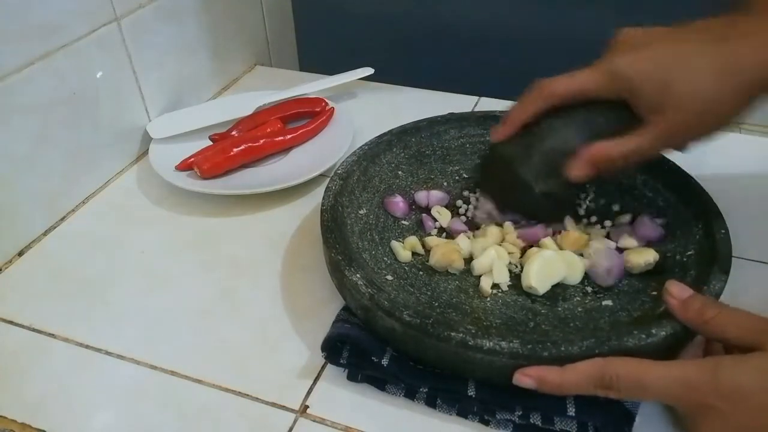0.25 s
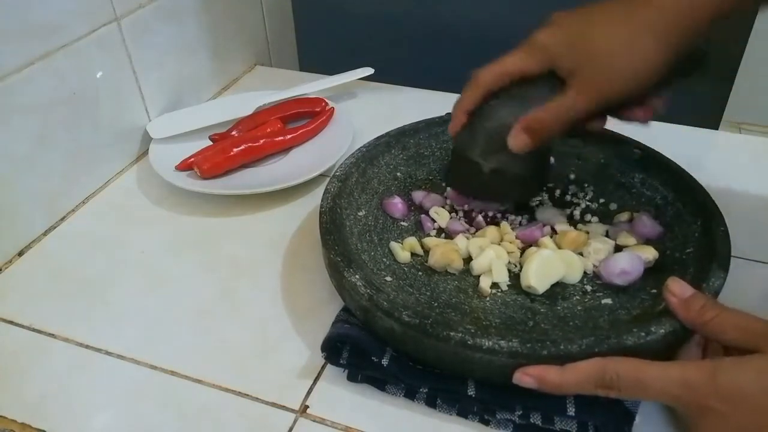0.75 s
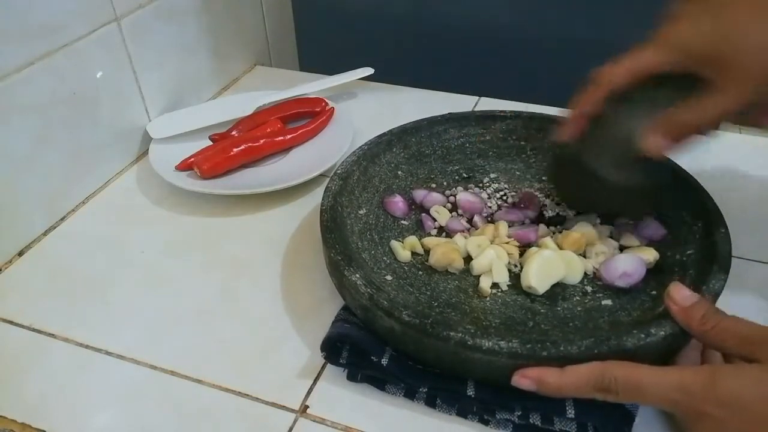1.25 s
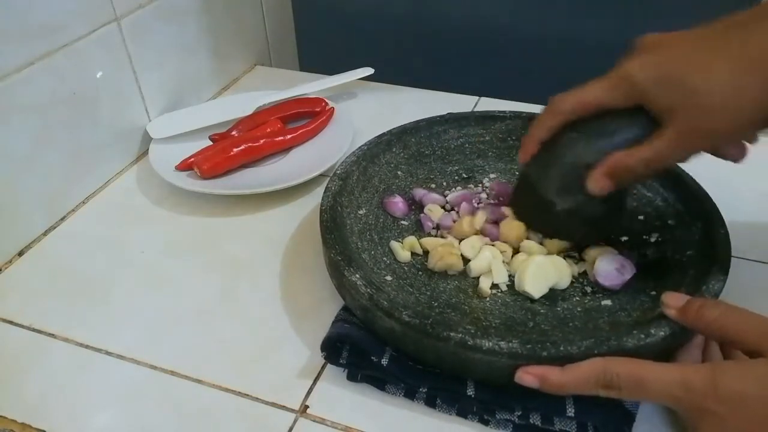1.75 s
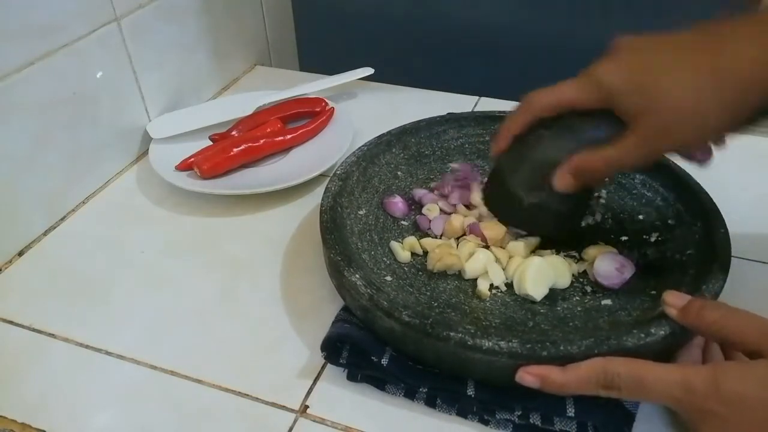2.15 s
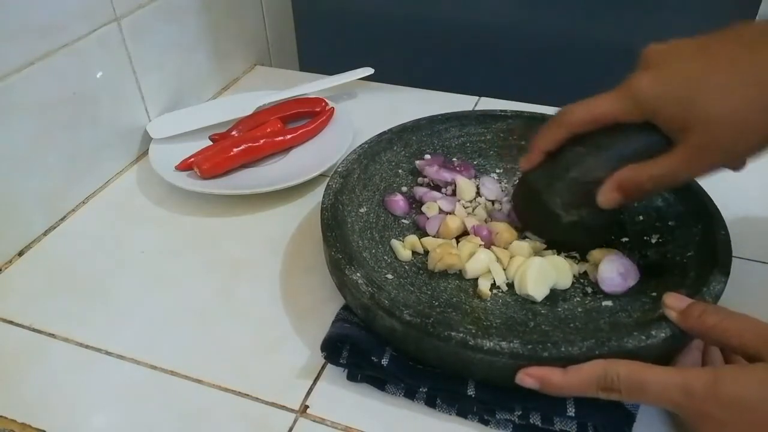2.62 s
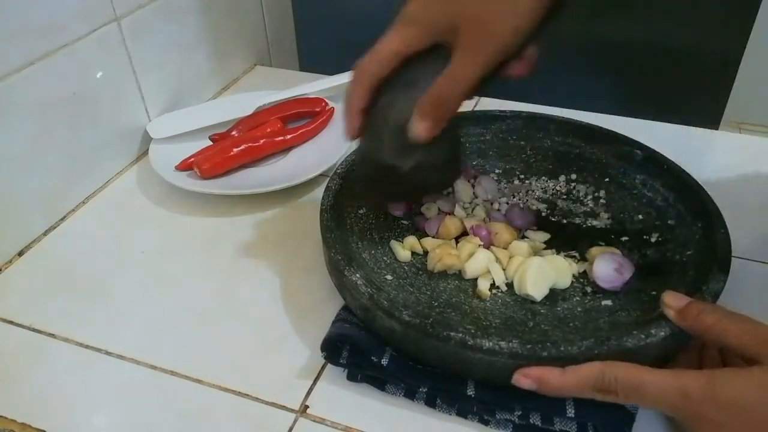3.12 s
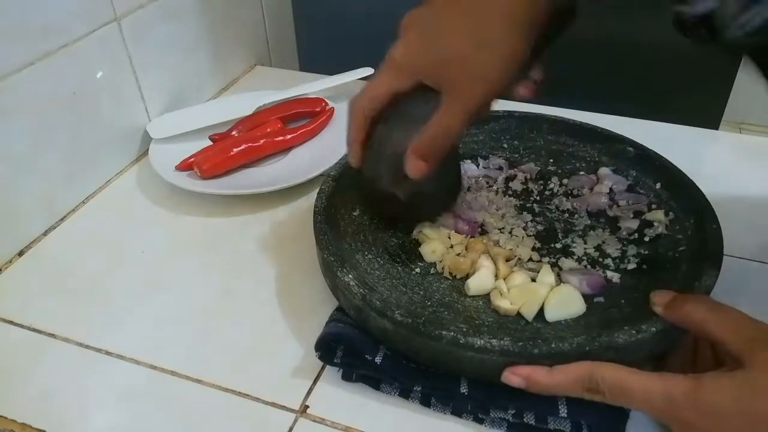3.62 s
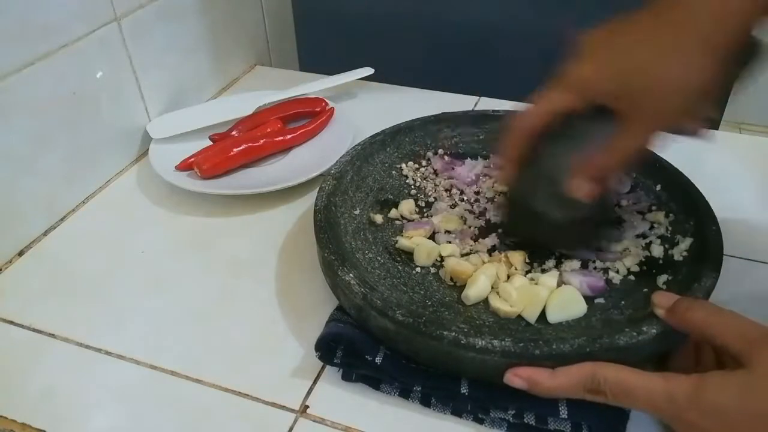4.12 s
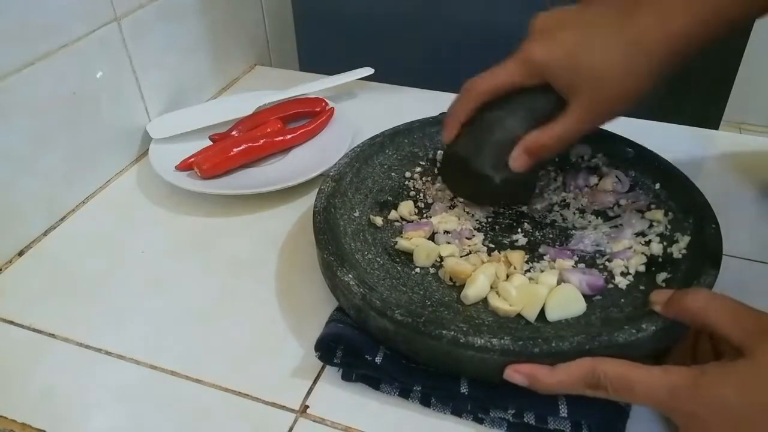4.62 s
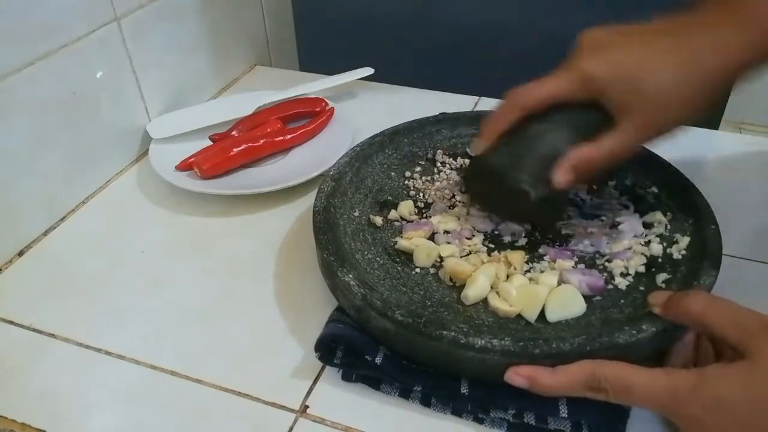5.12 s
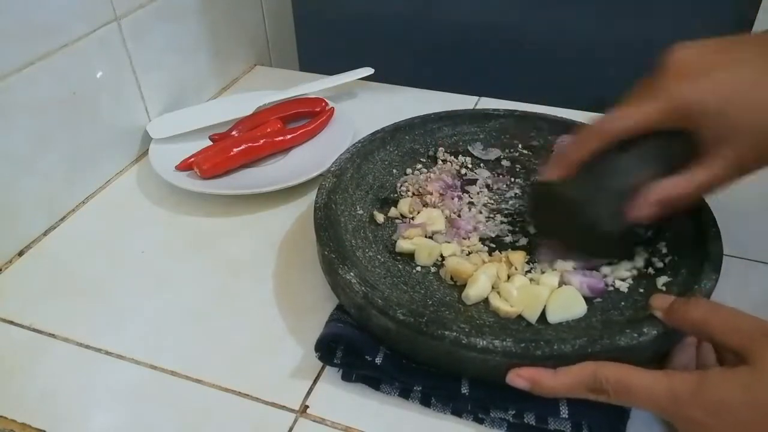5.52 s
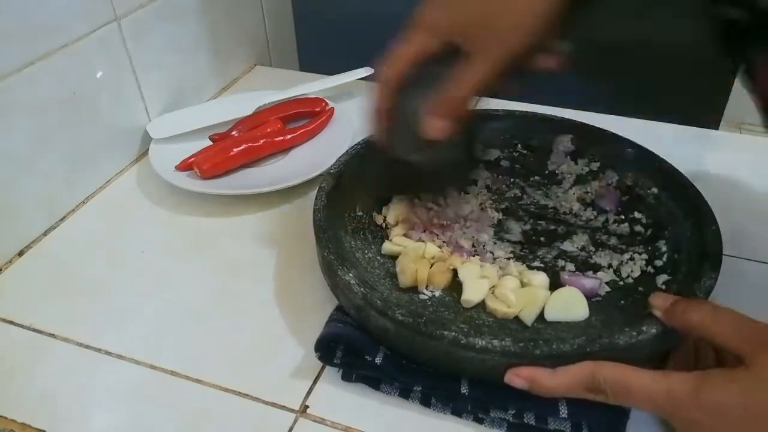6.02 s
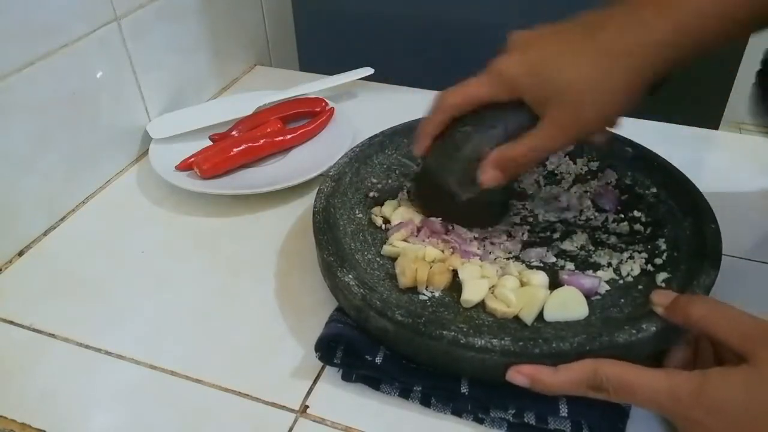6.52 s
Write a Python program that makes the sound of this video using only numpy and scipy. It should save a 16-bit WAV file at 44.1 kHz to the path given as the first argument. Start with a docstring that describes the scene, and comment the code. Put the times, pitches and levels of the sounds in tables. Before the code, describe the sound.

In a small tiled kitchen with a faint steady hum, a heavy stone pestle grinds spices from the first moment. Coarse crunching, dry crackle and stone rubbing pulse several times a second, with low thumps through the counter. After two short lulls the strokes resume, and bright hard knocks stand out in the second half. The microphones are close, stereo, with short hard reflections.

```python
"""An appliance hums throughout in a small hard kitchen: wavering sines over a soft wash of air.
From the start a stone pestle grinds spices in a flat mortar, in short strokes with brief lulls: bursting
noise for grit, the same kind of noise through the mortar's modes and through the counter's.
Seeds crack as coloured noise bursts; light knocks on the stone ring as decaying sines, and from the
middle on come the hardest. Tiled walls answer, and two microphone ports hear it from apart."""
import sys
import numpy as np
from scipy import signal
from scipy.fft import rfft, irfft, next_fast_len
from scipy.io import wavfile
from scipy.ndimage import uniform_filter1d, map_coordinates

SR = 44100
rng = np.random.default_rng(int(sys.argv[2]) if len(sys.argv) > 2 else 0)


def makeup_ratio(level_db):
    """Linear amplitude ratio for a level in decibels (20 dB per factor of ten)."""
    decades = np.asarray(level_db, float) / 20
    return 10 ** decades


def persist_wave(psi):
    """Save psi, clipped to +-1, as 16-bit WAV."""
    counts = np.round(np.clip(psi, -1, 1) * 32767).astype(np.int16)
    wavfile.write(sys.argv[1], SR, np.atleast_2d(counts).T)


N = 297675
T = np.arange(N) / SR

# The mortar's ringing modes. Each row: frequency in Hz, t60 of the free ring in s,
# relative level in dB when knocked, relative level in dB when rubbed.
MORTAR_MODES = [(1305.4, 0.089, 3.5, -8), (2264, 0.11, 1, 2), (3260, 0.13, 13, -13.5),
                (2250, 0.2, -30, -19), (812, 0.13, -23, -11), (1013, 0.018, -22, -11),
                (4190, 0.13, -45, -6.5), (5320, 0.22, -39, -19), (5700, 0.06, -31.5, -53)]


def unit(x):
    """Scaled to rms 1."""
    return x / np.sqrt(np.mean(x ** 2) + 1e-20)


def along(points, hz):
    """(Hz, value) points read on a log frequency axis."""
    f, v = np.transpose(points)
    return np.interp(np.log(hz + 1), np.log(f + 1), v)


def wobble(rate):
    """A smooth random curve with rate knots a second."""
    knots = rng.standard_normal(int(N * rate / SR) + 4)
    return map_coordinates(knots, [T * rate])


def filtered(x, response):
    """x shaped by a complex response, a function of frequency in Hz."""
    m = next_fast_len(N + SR // 2)
    return irfft(rfft(x, m) * response(np.fft.rfftfreq(m, 1 / SR)), m)[..., :N]


def peak(f, hz, width_hz):
    """One causal resonance of gain 1 at its centre."""
    return 1j * f * width_hz / (hz * hz - f * f + 1j * f * width_hz)


def spread(pair):
    """Mixes two unrelated signals so that left and right are as alike as the two ports hear them."""
    # Each row: frequency in Hz, left-right correlation (1 = identical).
    likeness = [(100, 1), (210, 1), (330, 0.4), (500, 0.033), (3000, 0.19), (15000, 0.15)]

    def mid_side_gains(hz):
        angle = np.arccos(np.clip(along(likeness, hz), -1, 1)) / 2
        return np.array([np.cos(angle), np.sin(angle)])

    mid, side = filtered(pair, mid_side_gains)
    return np.array([mid + side, mid - side])


def patchy(pair, depth_db):
    """Random patches of gain over time and frequency, the same in both channels."""
    z = signal.stft(pair, nperseg=256)[2]
    field = uniform_filter1d(rng.standard_normal(z.shape[1:]), size=8, axis=0)
    field = uniform_filter1d(field, size=6, axis=1)
    return signal.istft(z * makeup_ratio(depth_db * unit(field)), nperseg=256)[1][:, :N]


def crunch(per_second, size_db, life):
    """Noise under a hail of decaying bursts of very uneven size; life is their decay constant in s."""
    sizes = makeup_ratio(size_db * np.minimum(rng.exponential(size=N), 3.5))
    starts = (rng.random(N) < per_second / SR) * sizes
    hail = signal.lfilter([1], [1, -np.exp(-1 / (life * SR))], starts)
    return unit(hail * rng.standard_normal((2, N)))


def add(out, s, sound):
    """Lays a sound into both channels at time s."""
    at = round(s * SR)
    out[:, at:at + sound.shape[-1]] += sound


def room_tone():
    """Appliance hum of sines, each wavering by itself, over coloured noise that swells gently."""
    # Hum partials. Each row: frequency in Hz, rms level in dB around which it wavers.
    partials = [(50, -64), (100, -60), (151, -67), (200, -72), (250, -69), (300, -69), (442, -72),
                (491, -73), (540, -69), (589, -72), (887, -72)]
    # Colour of the air. Each row: frequency in Hz, relative level in dB per Hz.
    air_colour = [(15, -22), (30, -5), (70, -24), (300, -6), (410, -16.5), (540, -6.5), (1200, -17),
                  (1570, -13.5), (3000, -24), (7700, -34.5), (15500, -37)]
    hum = np.zeros(N)
    for hz, db in partials:
        tone = np.sin(2 * np.pi * (hz * T + rng.random()))
        hum += np.sqrt(2) * makeup_ratio(db + 1.9 * wobble(26)) * tone
    air = unit(filtered(spread(rng.standard_normal((2, N))), lambda hz: makeup_ratio(along(air_colour, hz))))
    air_db = -57 + 2 * wobble(6)
    return hum + makeup_ratio(air_db) * air


def pushes():
    """Gains of grit, stone and weight: each push swells and falls, silent until the pestle is down."""
    # Pushes of the pestle. Each row: time of the peak in s, ms in which the grit falls 20 dB, then
    # relative levels in dB of the grit, the bare stone rubbing and the weight on the counter.
    strokes = [(0, 300, -45, -49.5, -41.5), (.12, 155, -45, -61, -45), (.215, 105, -28, -30.5, -29),
               (.3, 143, -34, -43, -37.5), (0.377, 108, -35, -42.5, -41), (.5, 80, -55, -50, -50),
               (0.54, 79, -32, -38.5, -33.5), (.604, 100, -32.5, -43, -31.5), (0.677, 95, -31.5, -32, -32),
               (.755, 86, -56, -48.5, -45.5), (.86, 60, -53, -39, -55), (0.891, 113, -41, -35, -37.5),
               (0.989, 107, -38, -40.5, -35.5), (1.07, 154, -56, -55.5, -47), (1.215, 131, -59.5, -45, -52),
               (1.468, 110, -39.5, -77, -59), (1.555, 170, -37, -76, -48.5), (1.621, 97, -67, -44, -45),
               (1.719, 95, -31.5, -38, -32.5), (1.848, 171, -37, -47, -39), (2.023, 157, -47.5, -43, -45.5),
               (2.108, 91, -51, -48, -43), (2.164, 131, -34, -38.5, -36.5), (2.305, 143, -39.5, -45.5, -43),
               (2.39, 100, -54, -50, -44), (2.474, 128, -35, -44, -41.5), (2.514, 118, -36, -50, -47),
               (2.637, 98, -39.5, -38.5, -38.5), (2.767, 131, -49, -39, -39), (2.87, 148, -56, -64, -70),
               (3.2, 127, -47.5, -66, -43), (3.265, 57, -31.5, -42, -32), (3.364, 86, -38.5, -42.5, -40.5),
               (3.45, 56, -34.5, -35.5, -37), (3.592, 195, -44, -52, -42), (3.658, 147, -39.5, -47, -40.5),
               (3.768, 60, -31, -43, -41.5), (3.877, 140, -45.5, -45.5, -46), (3.958, 102, -35, -56, -57),
               (3.999, 52, -31, -34, -34.5), (4.067, 168, -40, -38.5, -42.5),
               (4.183, 72, -35.5, -43, -40.5), (4.29, 107, -36.5, -46, -47), (4.383, 36, -47, -58, -39.5),
               (4.56, 126, -35, -39.5, -35.5), (4.642, 79, -38.5, -48, -63), (4.77, 120, -48, -62, -44),
               (4.845, 120, -41.5, -49, -41), (4.899, 75, -36, -47, -34), (4.985, 90, -89.5, -64, -38),
               (5.073, 109, -39.5, -46.5, -34), (5.11, 83, -35, -36, -34.5), (5.15, 62, -33, -47.5, -41),
               (5.24, 74, -41.5, -38.5, -36.5), (5.315, 87.5, -33.5, -37.5, -34.5),
               (5.5, 145, -53, -49, -32), (5.569, 107, -35, -45, -33.5), (5.677, 200, -42, -43.5, -58),
               (5.74, 102, -43.5, -49, -41.5), (5.798, 104, -34, -37, -38), (5.906, 82, -42.5, -50, -40),
               (5.974, 69, -39, -37.5, -37.5), (6.158, 160, -38.5, -38.5, -31.5),
               (6.284, 60, -28, -34, -26.5), (6.368, 193, -40.5, -40, -39.5), (6.483, 71, -32, -40, -36.5),
               (6.583, 81, -38.5, -34, -37.5), (6.66, 57, -36.5, -33, -36.5)]
    # Times in s at which the lifted pestle meets the spices again.
    set_down = [0.173, 0.52, 0.595, 1.201, 1.419, 3.19, 3.578, 4.536, 4.976, 5.058, 5.289, 5.488, 6.081]
    landing_s = 0.011  # contact builds up in this time
    rise_share = 0.86  # a push swells in this share of the time it takes to fall
    rounded = 1.105  # above 1 the top of a push is broad and its flanks steep
    settle_db, settle_stretch = -30, 3.7  # loose grit settles after each push, weaker and slower
    stretches = (1, 0.76, 0.99)  # time scales of grit, stone and weight

    t = np.arange(0, N / SR + .002, .001)  # gains are drawn every ms
    s, fall_ms, *levels = np.transpose(strokes)[:, :, None]
    down = np.concatenate([[-1], set_down])  # the first pushes start with the pestle already down
    last_down = down[np.searchsorted(down, s) - 1]
    touching = np.clip((t - last_down) / landing_s, 0, 1) ** 2
    away = (np.maximum(t - s, (s - t) / rise_share) / (fall_ms / 1000)) ** rounded
    gains = []
    for db, stretch in zip(levels, stretches):
        fall_db = 20 * away / stretch
        push_power = makeup_ratio(2 * (db - fall_db))
        settling_power = (t > s) * makeup_ratio(2 * (db + settle_db - fall_db / settle_stretch))
        power = np.sum(touching * (push_power + settling_power), axis=0)
        gains.append(np.interp(T, t, np.sqrt(power)))
    return gains


def grinding():
    """Grit shears under the pestle, rubs the mortar's modes and shakes the counter's resonances."""
    # Where the pestle works and on what. Each row: time in s, gain in dB of the modes above 4 kHz,
    # gain in dB of the grit's dry fizz, gain in dB of the modes below 2 kHz or from 3 to 4 kHz.
    roam = [(0, 9, 2.5, 5), (.7, 6.5, 2, 1.5), (1.3, -1.5, 2, 0.5), (1.8, 1.5, 3.5, 1.5), (2.4, 2, -1, -1),
            (2.8, 2, -4, -1), (3.4, -4, -3, 0.5), (4, -5, 0, -7.5), (4.75, -4, 0, 11), (5.2, 4, 1, 3),
            (5.6, -2, -9.5, 0.5), (6.2, 0, 2, 1.5), (6.75, -4, -11, -5)]
    # Colour of the grit. Each row: frequency in Hz, relative level in dB.
    grit_colour = [(250, -1), (400, -8), (900, -6), (1700, -1), (3000, -2), (5500, 3), (8000, -3.5),
                   (11000, -2), (13500, -9.5), (15000, -8)]
    # Counter resonances. Each row: frequency in Hz, width in Hz, relative level in dB.
    counter = [(68.6, 43, -12), (100, 16, -3), (148.7, 19.7, 0.5), (208.5, 17.2, 3), (296, 76, -10)]
    shearing, rubbing, weight = pushes()
    s, *cols = np.transpose(roam)
    reach_db, fizz_db, deep_db = [np.interp(T, s, c) for c in cols]
    slip = wobble(25)  # the stroke catches and slips

    shear = 0.94 * rng.standard_normal((2, N))
    shear += 0.55 * crunch(per_second=300, size_db=2, life=0.0016)
    grit = unit(filtered(patchy(spread(shear), depth_db=2.5), lambda hz: makeup_ratio(along(grit_colour, hz))))
    fizz = filtered(grit, lambda hz: np.clip((hz - 9500) / 3000, 0, 1))
    grit += (makeup_ratio(fizz_db) - 1) * fizz

    rub = rubbing * makeup_ratio(1.65 * slip) * crunch(per_second=300, size_db=0.0, life=0.0033)
    song = np.zeros((2, N))
    for hz, t60, _, db in MORTAR_MODES:
        # as the pestle roams, each mode flares and dies on its own
        mode_db = db + 2.2 * wobble(20)
        mode_db = mode_db + reach_db * (hz > 4000) + deep_db * (hz < 2000 or 3000 < hz < 4000)
        width_hz = 1.76 * 2.17 / t60  # the pestle's weight widens every mode
        ringing = signal.lfilter(*signal.iirpeak(hz, hz / width_hz, SR), rub)
        song += makeup_ratio(mode_db) * np.sqrt(t60) * ringing

    def slab(f):
        # neighbouring resonances have opposite signs
        return sum((-1) ** k * makeup_ratio(db) * peak(f, hz, w) for k, (hz, w, db) in enumerate(counter))

    push = weight * makeup_ratio(1.97 * wobble(30)) * rng.standard_normal((2, N))
    thud = filtered(spread(push), slab)
    return shearing * makeup_ratio(0.89 * slip) * grit + makeup_ratio(34.5) * spread(song) + makeup_ratio(23.5) * thud


def knocks():
    """Modes swell while stone bears on stone, then the hand chokes most of the ring; a dull clack fills in."""
    # Pestle touches on the mortar. Each row: start in s, level in dB,
    # gain in dB of the second mode, gain in dB of the third mode, contact in ms.
    touches = [(0, -33.5, -20, -18.5, 53), (.208, -33.5, 14, -21, 25), (.533, -44, 9, -9, 14),
               (.603, -42, 11, -11, 8.7), (.628, -37, -5, -13, 13), (.675, -31.5, -4, -24, 1.9),
               (1.210, -50.5, -9, -29, 11), (1.712, -36.5, -11, -6, 7.6), (2.107, -46, 11, -1.5, 18),
               (3.198, -46.5, 2, -30, 30), (3.584, -15.5, -18, -15, 27), (3.615, -22.5, -31, -21, 12),
               (3.642, -35.5, -14, 3, 6.9), (3.99, -44, -8, -20, 3.4), (4.479, -16.5, -4, -15.5, 31),
               (4.49, -15, -6, -8, 7.5), (4.503, -30.5, 12, -34, 17.6), (4.535, -22, -18, -27, 2.4),
               (4.606, -35.5, -15, -17, 8.5), (4.898, -38, 7, -4, 14), (4.979, -33.5, -29, -11, 15),
               (5.012, -24.5, -31, -26, 35), (5.044, -25.5, -26, -6.5, 9.9), (5.072, -43, -13, -23, 10),
               (5.493, -12.5, -5.5, -43, 12.2), (5.508, -19, -3, -24, 33), (5.556, -50, -12, -22, 22),
               (5.585, -35, -6, -19, 27), (5.605, -40.5, -14, -29, 44), (6.083, -13, -14, -29, 17.5),
               (6.115, -36, -8, -7, 14), (6.283, -47, 4, 3, 5.4)]
    # Bumps on the floor through the paste, a clack with hardly any ring. Each row: start in s, level in dB.
    bumps = [(.205, -23), (.533, -36), (0.676, -28), (.99, -30), (1.72, -41), (3.996, -20.5), (5.02, -26),
             (6.28, -26)]
    out, t = np.zeros((2, N + SR)), np.arange(SR // 4) / SR
    dull = signal.butter(3, [500, 2600], "band", fs=SR)

    def dull_noise():
        return signal.lfilter(*dull, rng.standard_normal((2, len(t))))

    for s, db, second_db, third_db, contact_ms in touches:
        u = np.clip(t / (contact_ms / 1000), 0, 1)
        bearing = np.sin(np.pi * u ** .75)
        # where it lands picks the modes
        others_db = rng.normal(0, 1.1, len(MORTAR_MODES))[3:]
        place_db = np.concatenate([[0, second_db, third_db], others_db])
        ring = np.zeros(len(t))
        for (hz, t60, level, _), gain in zip(MORTAR_MODES, place_db):
            swell = bearing + 0.36 * u * makeup_ratio(-60 * t / t60)
            ring += makeup_ratio(level + gain) * np.sin(2 * np.pi * hz * t) * swell
        clack = dull_noise() * (bearing + 0.55 * u * makeup_ratio(-60 * t / 0.23))
        clack_db = -7 + 0.63 * db  # the clack grows slower than the ring
        add(out, s, makeup_ratio(db) * ring + makeup_ratio(clack_db) * clack)
    for s, db in bumps:
        envelope = makeup_ratio(db - 60 * t / 0.049) * (1 - np.exp(-t / 0.0025))  # t60 49 ms
        add(out, s, envelope * unit(dull_noise()))
    return out[:, :N]


def cracks():
    """A seed snaps: a few ms of noise and a weaker tail, coloured mostly where the microphone ports resonate."""
    # Seeds that crack loudly. Each row: start in s, level in dB, centre frequency of the colour in Hz.
    seeds = [(0.08, -36, 6500), (0.2083, -29, 9300), (0.375, -28, 8950), (0.534, -45, 6510),
             (0.6028, -28, 6950), (0.625, -30, 6100), (0.975, -33, 6340), (1.215, -49, 5260),
             (1.4327, -49, 6960), (1.6823, -40, 6500), (1.838, -29, 8200), (2.1095, -32.5, 6040),
             (2.162, -30, 6370), (2.4625, -26.5, 6350), (3.1967, -32, 6960), (3.596, -33, 5020),
             (3.7587, -36, 9300), (3.9566, -35, 6500), (4.6432, -31.5, 9100), (4.98, -31.5, 5300),
             (5.0717, -33.5, 6060), (5.3073, -26.5, 6450), (5.496, -26, 6060), (5.5605, -32, 6160),
             (6.2577, -31, 6100), (6.2827, -19.5, 9100), (6.581, -26.5, 5900)]
    out, t = np.zeros((2, N + SR)), np.arange(SR // 20) / SR
    fall = makeup_ratio(-60 * t / .012) + .4 * makeup_ratio(-60 * t / .045)  # t60 12 ms, then 45 ms
    burst = (1 - np.exp(-t / .0005)) * fall
    for s, db, centre_hz in seeds:
        snap = rng.standard_normal((2, len(t))) * burst
        coloured = signal.lfilter(*signal.iirpeak(centre_hz, 4, SR), snap)
        add(out, s, makeup_ratio(db) * (2.9 * coloured + 0.5 * snap))
    return out[:, :N]


def kitchen(x):
    """Tiled walls answer with a noise tail in which each frequency dies at its own speed."""
    # Each row: frequency in Hz, t60 in s.
    decay = [(200, 0.041), (1300, 0.38), (4000, 0.09), (12000, 0.04)]
    hz, t, z = signal.stft(rng.standard_normal((2, SR // 2)), SR, nperseg=256)
    fading = z * makeup_ratio(-60 * t / along(decay, hz)[:, None])
    tail = signal.istft(fading, SR, nperseg=256)[1]
    late = np.pad(x, ((0, 0), (150, 0)))  # the answer starts 150 samples late
    return signal.fftconvolve(late, tail / np.linalg.norm(tail[0]), axes=1)[:, :N]


def scene():
    """Pestle and mortar in the kitchen, over the room tone."""
    blows = knocks()
    near = grinding() + cracks()
    heard = blows + near + kitchen(makeup_ratio(-11) * blows + makeup_ratio(-14.5) * near)
    # the left port also hears the blows off the tiles beside it
    wall_ms = 0.2
    heard[0] += filtered(blows[0], lambda hz: 0.1 * np.exp(-2j * np.pi * hz * wall_ms / 1000))
    heard[0] = np.roll(heard[0], 6)  # and hears everything but the room tone 6 samples late
    return heard + room_tone()


def top_cut(x):
    """Nothing passes above the cut-off."""
    return signal.sosfilt(signal.butter(12, 16510, fs=SR, output="sos"), x)


def record(dry):
    """Each port colours the treble at its cavities, and nothing passes the band limit."""
    # One list for the left port, one for the right.
    # Each row: cavity frequency in Hz, width in Hz, gain at its centre in dB.
    ports = [
        [(9100, 1210, 9.6), (13700, 1400, 1.8)],
        [(6570, 540, 13.5), (9040, 6600, -8.5)],
    ]
    top_hz = 15900

    def port(f, cavities):
        return np.prod([1 + (makeup_ratio(db) - 1) * peak(f, hz, w) for hz, w, db in cavities], axis=0)

    heard = filtered(dry, lambda f: np.array([port(f, c) for c in ports]) * (f < top_hz))
    return top_cut(heard)


dry = scene()
out = record(dry)
persist_wave(out)
```